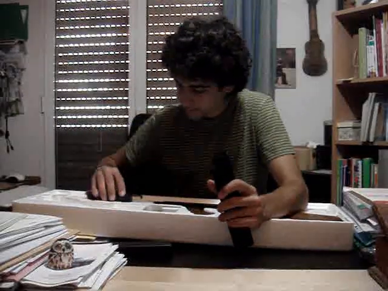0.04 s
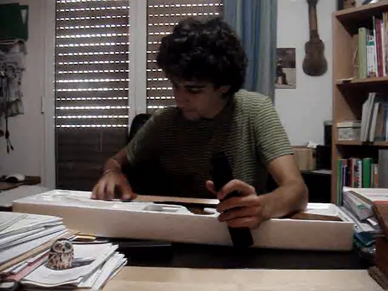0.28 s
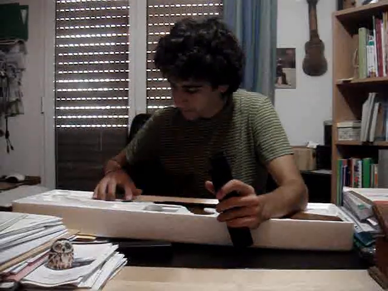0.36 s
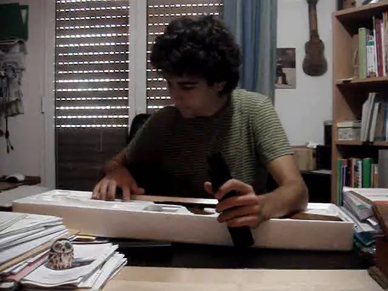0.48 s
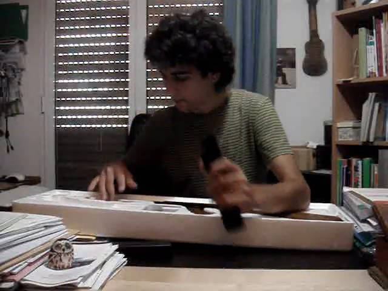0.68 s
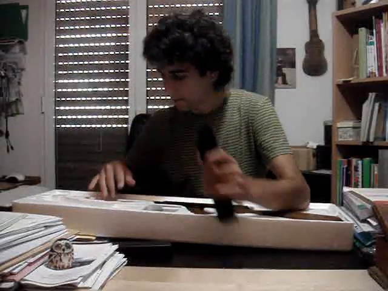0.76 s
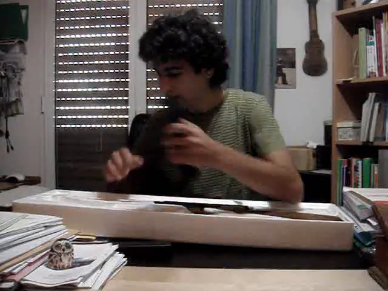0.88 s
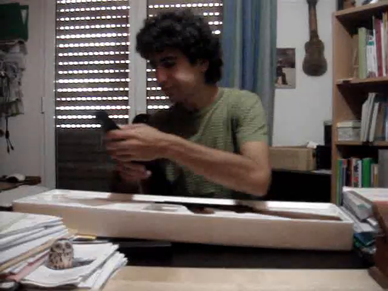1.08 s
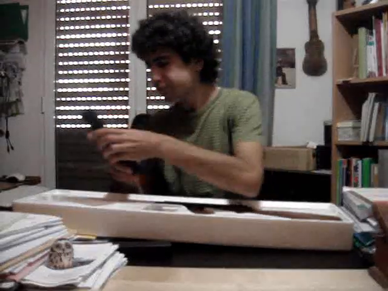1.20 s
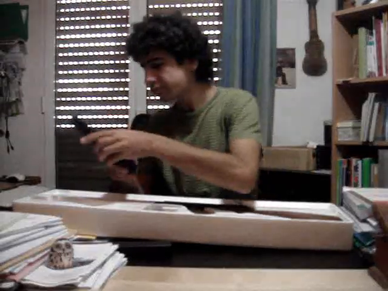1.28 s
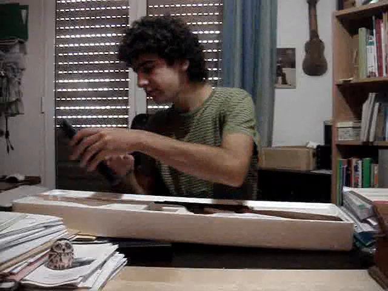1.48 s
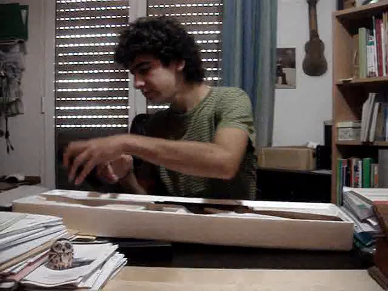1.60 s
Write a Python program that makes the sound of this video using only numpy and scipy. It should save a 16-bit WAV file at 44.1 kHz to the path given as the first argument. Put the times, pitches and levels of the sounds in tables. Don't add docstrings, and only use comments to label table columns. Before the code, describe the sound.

Hollow clunks of plastic parts dropped in a foam-lined box on a desk, rattling and clicking

```python
import sys
import numpy as np
from scipy import signal
from scipy.fft import rfft, irfft, next_fast_len
from scipy.io import wavfile
from scipy.ndimage import uniform_filter1d, map_coordinates

SR = 44100
rng = np.random.default_rng(int(sys.argv[2]) if len(sys.argv) > 2 else 0)


def int16_out(signal):
    q = np.round(np.clip(np.atleast_2d(signal).T, -1, 1) * 32767)
    wavfile.write(sys.argv[1], SR, q.astype(np.int16))


def undo_db(level):
    steps = np.asarray(level, float) / 20
    return 10 ** steps


N = 72765

# frequency in Hz, level in dB per Hz.
ROOM_NOISE = [(30, -25), (110, -11.5), (230, -4.5), (680, -3), (1100, -12), (4500, -18.5), (9300, -24.5),
              (10500, -39)]
# frequency in Hz, 60 dB decay time in seconds.
ROOM_DECAY = [(100, 0.17), (300, 0.33), (800, 0.26), (2000, .28), (5000, 0.28), (12000, 0.27)]
# frequency in Hz, level in dB per Hz.
LINING = [(88, -59), (150, -7), (382, -6.5), (512, -4), (741, -1.5), (3320, -10), (3960, -12),
          (12000, -28.5), (15800, -31)]
# start in seconds, rise in seconds, fall in seconds, level in dB.
SCRAPES = [
    (-.03, 0.023, 0.14, -40.5),
    (0.108, 0.044, 0.12, -46.5),
    (0.17, 0.0067, 0.026, -34.5),
    (.18, 0.027, 0.071, -27.5),
    (0.353, 0.017, 0.094, -30.5),
    (.47, 0.096, .015, -27),
    (0.689, 0.034, 0.063, -38),
    (.74, 0.027, 0.14, -36.5),
]
# start in seconds, level in dB, pitch in Hz, 60 dB decay time in seconds.
CLICKS = [(.0862, -37, 1500, 0.008), (.1316, -47, 1000, .008), (.1725, -34, 2600, 0.0065),
          (.185, -24, 1860, 0.037), (.198, -27, 785, 0.0072), (.2055, -21.5, 650, 0.033),
          (.214, -23, 1119, 0.019), (.371, -38, 2050, 0.017), (.455, -36, 620, 0.061),
          (0.511, -38, 1250, 0.013), (0.521, -23.5, 1130, 0.042), (.5287, -17.5, 1360, 0.028),
          (.6973, -26, 1400, 0.01), (.707, -31.5, 670, 0.026), (.7188, -33, 1610, 0.021),
          (.7482, -29, 1700, 0.017), (.7652, -25, 1440, 0.013), (.786, -45, 780, 0.029),
          (.8592, -22, 2220, 0.0054), (.894, -22.5, 994, 0.019), (1.0256, -36, 2670, 0.005),
          (1.1443, -36.5, 2280, 0.0059)]
# start in seconds, level in dB, pitch in Hz, 60 dB
# decay time in seconds.
KNOCKS = [(0.2376, -7, 593, 0.13), (.5337, -3, 565, 0.073), (.5425, -2.5, 810, 0.035),
          (0.5415, -7.5, 2800, 0.013), (.554, -18, 2990, 0.029), (.572, -20, 3250, .025),
          (.584, -22, 3200, 0.023), (.5565, -14, 770, .03), (0.57, -11, 698, 0.046),
          (.586, -14, 620, 0.035), (0.72, -31.5, 720, 0.062), (.8615, -23, 950, .04),
          (.7655, -17, 776, 0.02), (.8595, -10, 1355, 0.013), (.866, -25, 640, .04), (.872, -22.5, 245, .1),
          (0.62, -23, 1330, 0.016), (0.68, -27, 1500, 0.01), (0.24, -16.5, 250, 0.14)]
# start in seconds, level in dB, tilt of the box modes in dB
# per octave, level of the rattle in dB.
DROPS = [
    (.2382, 6, 5.5, -3),
    (.2465, 2.5, -1, 1),
    (.2525, 2, -1, 0),
    (.2675, -2.5, 13, 5.5),
    (.5335, -5, 3, 3),
    (.542, -3, -0.5, 2.5),
    (.557, -11, -3, -5),
    (.574, -21, -0.5, -20),
    (.8597, -21, 1.5, 11),
    (.867, -20, -2, -13),
]
# frequency in Hz, level in dB, 60 dB decay time in seconds.
BOX_MODES = [(117.4, 1, 0.06), (267, -6, 0.23), (324, -3.5, 0.036), (446, -6, 0.077), (503.7, -2, 0.088),
             (560, -7, 0.084), (615, -7.5, 0.072), (666.4, 2.5, 0.075), (729, 4, 0.04), (799, 1, 0.046),
             (895.6, -2, 0.029), (986, -23, 0.12), (1024, -4.5, 0.062), (1320, -43, 0.024)]
# frequency in Hz, level in dB per Hz.
BOX_WALLS = [(200, -21), (400, -2.5), (620, 5), (850, -4.5), (1200, -17), (2000, -43)]
# frequency in Hz, level in dB, 60 dB decay time in seconds.
SHELL_MODES = [(1640, 1, 0.013), (1935, -3, 0.019), (2060, -6, 0.0076), (2530, -6.5, 0.022),
               (2750, -7.5, 0.046), (3224, -0.5, 0.019)]
# frequency in Hz, level in dB per Hz.
CRACK = [(710, -49), (1200, -6.5), (1620, -8.5), (1810, -0.5), (3170, -11), (3600, -6.5), (10500, -26),
         (13600, -70), (22000, -120)]
# start in seconds, end in seconds, lowest ducked frequency in Hz.
TREBLE_GAPS = [
    (.519, .527, 2800),
    (.8445, .858, 3600),
]


def unit(x):
    return x / np.sqrt(np.mean(x ** 2) + 1e-20)


def noise(length):
    return rng.standard_normal(length)


def along(points, hz):
    f, v = np.transpose(points)
    return np.interp(np.log(hz + 1), np.log(f + 1), v)


def filtered(x, response):
    m = next_fast_len(len(x) + 8192)
    spectrum = rfft(x, m) * response(np.fft.rfftfreq(m, 1 / SR))
    return irfft(spectrum, m)[:len(x)]


def coloured(x, spectrum):
    return unit(filtered(x, lambda hz: undo_db(along(spectrum, hz))))


def fade(t, t60):
    return undo_db(-60 * t / max(t60, 1e-3))


def soft_start(t, seconds):
    return 1 - np.exp(-t / seconds)


def ring(t, modes, scatter_db):
    out = np.zeros(len(t))
    for hz, db, t60 in modes:
        strength = undo_db(db + scatter_db * rng.standard_normal())
        out += strength * fade(t, t60) * np.sin(2 * np.pi * hz * t)
    return out


def add(track, s, sound, wet_db=0):
    hz, t, z = signal.stft(noise(SR // 2), SR, nperseg=256)
    decay = undo_db(-60 * t / along(ROOM_DECAY, hz)[:, None])
    tail = signal.istft(z * decay, SR, nperseg=256)[1]
    wet = undo_db(wet_db) * signal.fftconvolve(sound, tail / np.linalg.norm(tail))
    for start, part in ((s, sound), (s + 0.004, wet)):
        place = track[round(start * SR):][:len(part)]
        place += part[:len(place)]


def room_tone():
    t = np.arange(N) / SR
    z = signal.stft(noise(N + 512), nperseg=512)[2]
    patches = uniform_filter1d(uniform_filter1d(rng.standard_normal(z.shape), 5, 0), 10, 1)
    hiss = signal.istft(z * undo_db(1.1 * unit(patches)), nperseg=512)[1][:N]
    whine_hz, whine_width_hz, whine_db = 7750, 130, 7.5
    hiss = filtered(hiss, lambda hz: undo_db(whine_db * np.exp(-((hz - whine_hz) / whine_width_hz) ** 2)))
    hum_hz, hum_db, peak_s, width_s = 71.5, -57, 1.24, 0.14
    swell = np.exp(-((t - peak_s) / width_s) ** 2 / 2)
    drift = map_coordinates(rng.standard_normal((2, 24)), [[np.zeros(N), np.ones(N)], [t * 10.94] * 2])
    engine = np.sin(2 * np.pi * hum_hz * t + 0.83 * drift[1])
    hum = np.sqrt(2) * undo_db(hum_db + 2.5 * drift[0]) * swell * engine
    rumble = undo_db(-71) * coloured(noise(N), [(15, -6), (113, 0.5), (250, -40)])
    return undo_db(-48.5) * coloured(hiss, ROOM_NOISE) + hum + rumble


def scrapes():
    t = np.arange(N) / SR
    grains_per_s, spread_db = 6000, 4.5
    draw = rng.random((3, N))
    caught = draw[0] < grains_per_s / SR
    grains = caught * np.sign(draw[1] - 0.5) * undo_db(-spread_db * np.log(draw[2] + 0.02))
    rub = coloured(unit(grains) + 0.74 * noise(N), LINING)
    strokes = np.zeros(N)
    for s, rise, fall, db in SCRAPES:
        swell = np.clip((t - s) / rise, 0, 1) ** 2
        release = np.exp(-np.maximum(t - s - rise, 0) / (fall / 2))
        strokes += undo_db(db) * swell * release
    return rub * strokes


def clicks():
    out, t = np.zeros(N), np.arange(SR // 10) / SR
    for s, db, hz, t60 in CLICKS:
        tone = ring(t, [(hz, 0, t60), (hz * 1.8, -14, t60 * 0.77)], scatter_db=1.5)
        tick = undo_db(-7.5) * coloured(noise(len(t)), LINING) * fade(t, 0.048)
        add(out, s, undo_db(db) * (tone + tick) * soft_start(t, 0.00051), wet_db=-3)
    return out


def knocks():
    out, t = np.zeros(N), np.arange(SR // 8) / SR
    for s, db, hz, t60 in KNOCKS:
        note = ring(t, [(hz, 0, t60)], scatter_db=0)
        add(out, s, undo_db(db) * note * soft_start(t, 0.00077), wet_db=-6.5)
    return out


def box_boom(t, tilt_db):
    modes = [(hz, db + tilt_db * np.log2(hz / 600), t60) for hz, db, t60 in BOX_MODES]
    walls = coloured(noise(len(t)), BOX_WALLS) * fade(t, 0.056) * soft_start(t, 0.00052)
    return ring(t, modes, scatter_db=6.5) / 7.0 + undo_db(-10.5) * walls


def shell_rattle(t):
    crack = coloured(noise(len(t)), CRACK) * fade(t, 0.033)
    bright = undo_db(-21.5) * ring(t, SHELL_MODES, scatter_db=5.5) + undo_db(-17.5) * crack
    return bright * soft_start(t, 0.00025)


def drops():
    out, t = np.zeros(N), np.arange(SR // 4) / SR
    for s, db, tilt_db, rattle_db in DROPS:
        add(out, s, undo_db(db) * (box_boom(t, tilt_db) + undo_db(rattle_db) * shell_rattle(t)))
    return out


def scene():
    cut_hz = 208
    handling = drops() + clicks() + scrapes() + knocks()
    handling = filtered(handling, lambda hz: (1j * hz / (cut_hz + 1j * hz)) ** 2)
    return (handling + room_tone())[None]


def top_cut(x):
    return signal.sosfilt(signal.butter(12, 16800, fs=SR, output="sos"), x)


def record(dry):
    t = np.arange(N) / SR
    ceiling, hardness, clock_hz = 0.98, 3.1, 12080
    x = dry[0] / (1 + np.abs(dry[0] / ceiling) ** hardness) ** (1 / hardness)
    x = x + 0.028 * filtered(x ** 4, lambda hz: (hz > 20) * (hz < 150))
    mirror = undo_db(-35) * 2 * x * np.sin(2 * np.pi * clock_hz * t)
    level = np.sqrt(np.abs(uniform_filter1d(x ** 2, size=300)))
    fizz = undo_db(-27.5) * level * coloured(noise(N), [(8000, -62), (10500, -26), (15000, -10.0)])
    x = filtered(x + mirror + fizz, lambda hz: hz < 15850)
    for start, end, above_hz in TREBLE_GAPS:
        gate = uniform_filter1d(1. * (t > start) * (t < end), size=60)
        treble = filtered(x * gate, lambda hz: hz > above_hz)
        x = x - (1 - undo_db(-14.5)) * gate * treble
    return top_cut(x[None])


dry = scene()
out = record(dry)
int16_out(out)
```